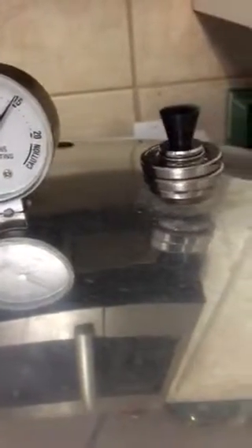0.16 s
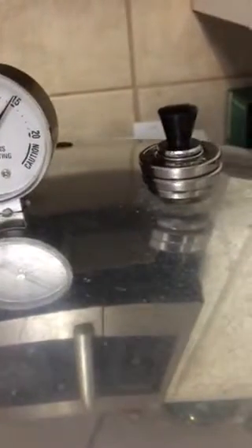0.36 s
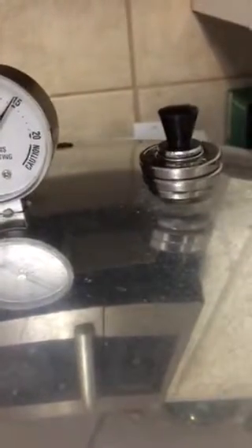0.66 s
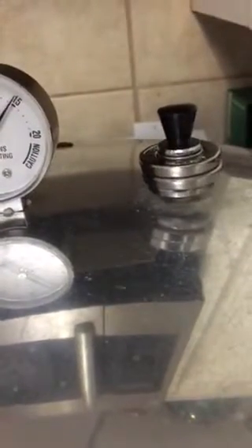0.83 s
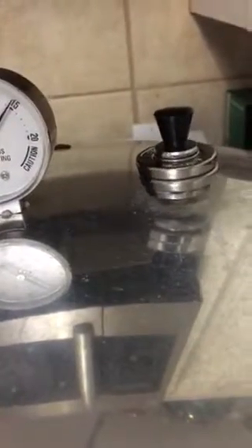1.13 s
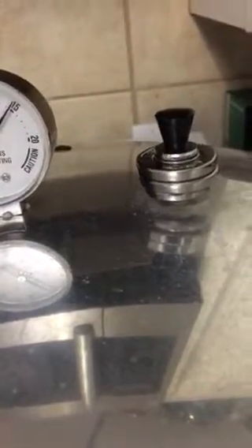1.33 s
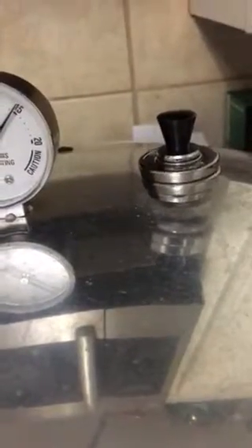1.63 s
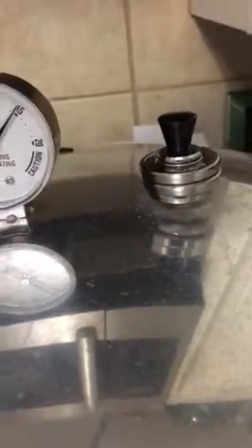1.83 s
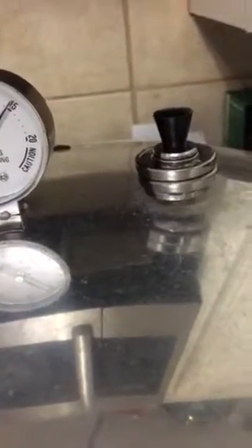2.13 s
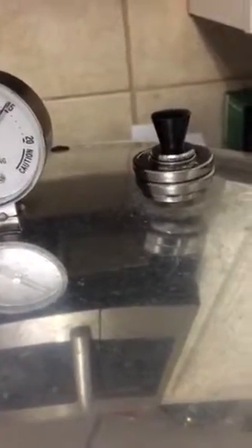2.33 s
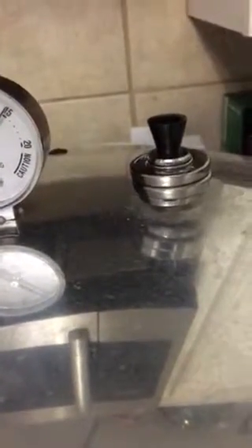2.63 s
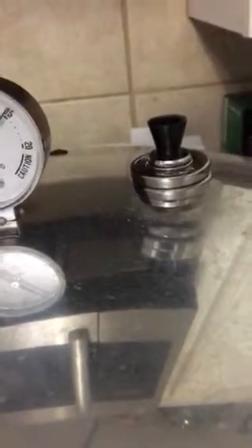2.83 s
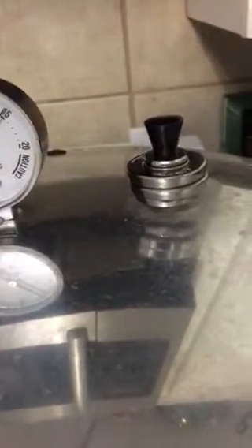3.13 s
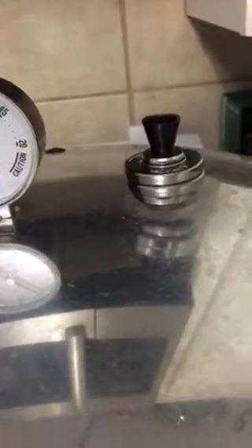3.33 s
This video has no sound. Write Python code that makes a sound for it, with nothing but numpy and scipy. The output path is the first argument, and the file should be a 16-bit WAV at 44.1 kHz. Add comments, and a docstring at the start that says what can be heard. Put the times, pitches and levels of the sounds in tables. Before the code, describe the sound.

A pressure cooker hisses close by in a kitchen, its rocking weight releasing wet steam in quick, uneven spurts for the whole three and a half seconds. Drops spit sharply near 0.5 and 3.3 seconds. Between about 0.9 and 2.7 seconds the jet occasionally takes on a thin, breathy whistle. Underneath, the boiling pot softly knocks, rings and gurgles over a low burner rumble.

```python
"""A pressure cooker at full pressure, heard from close by in a tiled kitchen.
From the start the regulator weight rocks on its vent, releasing wet steam in quick, uneven spurts
over a steady leak, while the boiling pot knocks, rings near 1 kHz and gurgles above the burner's
rumble. A drop spits sharply near 0.5 s and the bass swells at 0.8 s. From 0.9 to 2.7 s the jet
now and then whistles on the rim, and near 3.3 s another drop spits sharply."""
import sys
import numpy as np
from scipy import signal
from scipy.fft import rfft, irfft
from scipy.io import wavfile

SR = 44100
rng = np.random.default_rng(int(sys.argv[2]) if len(sys.argv) > 2 else 0)


def pcm_store(signal):
    """Save signal as 16-bit PCM."""
    levels = np.round(np.clip(np.atleast_2d(signal), -1, 1) * 32767)
    wavfile.write(sys.argv[1], SR, levels.astype(np.int16).T)


N = 153468
TIME = np.arange(N) / SR
FREQS = np.maximum(np.fft.rfftfreq(N, 1 / SR), 1)

# Steam let out as the weight tips. Each row: centre in seconds, length in seconds, hiss level in dB,
# then sizzle and rush in dB relative to it, all before the trims in steam().
SPURT_EVENTS = [(0.007, 0.056, -41, -7.1, 0.3), (0.113, 0.056, -39, -5.5, -1), (0.169, 0.019, -41, -12, 3),
                (0.225, 0.037, -40.2, -7.1, 0), (0.307, 0.029, -37.5, -13, 1.7), (0.37, 0.021, -36, -20, 1),
                (0.416, 0.02, -32, -9, 1.3), (0.466, 0.021, -29, -2, -11), (0.518, 0.025, -37.5, -6.5, 2.5),
                (0.563, 0.019, -41.5, -8.4, 3.5), (0.618, 0.028, -37, -12, 4.5),
                (0.665, 0.024, -40.5, -4.5, 0), (0.723, 0.024, -32.5, -14, 1),
                (0.769, 0.032, -39.5, -5, 0.7), (0.815, 0.018, -32, -7, 0), (0.901, 0.038, -37.5, -0.5, -5),
                (1.02, 0.1, -42, -1, 0), (1.118, 0.04, -37, -6, 1), (1.152, 0.018, -33.5, -3.9, -0.5),
                (1.208, 0.019, -35, -7, 3.2), (1.236, 0.04, -42, -1, -3), (1.293, 0.033, -40, -3.5, 0.7),
                (1.34, 0.021, -40.9, -5.0, 5), (1.44, 0.083, -38, -4, 0.5), (1.489, 0.017, -34.5, -0.5, 0),
                (1.541, 0.019, -39.5, -5, 5), (1.589, 0.022, -36, -6, -1.5), (1.64, 0.023, -35.5, -5, -1),
                (1.681, 0.024, -42.6, -6, 4), (1.738, 0.023, -31, -6.5, 2), (1.819, 0.039, -35.5, -6.5, -1),
                (1.895, 0.018, -30, -8, 0.2), (1.967, 0.049, -39, -6, 2.3), (2.06, 0.061, -42, -5, 3.5),
                (2.154, 0.1, -40, -4, 4), (2.189, 0.022, -37.5, -14, 1.5), (2.264, 0.046, -36, -9.5, 0.8),
                (2.285, 0.011, -35.5, -1.5, -13), (2.325, 0.026, -44, 1, -14),
                (2.37, 0.036, -35.3, -9, 0.6), (2.454, 0.071, -38.5, -6, -1),
                (2.499, 0.025, -35, -12, -3.5), (2.565, 0.023, -34, -7.5, -0.3),
                (2.599, 0.024, -35.5, -4, -1.5), (2.665, 0.031, -34, -5, -1), (2.71, 0.08, -38.5, -4.5, 1),
                (2.798, 0.021, -31.5, -6.5, 0.7), (2.857, 0.03, -35.5, -1.5, -8),
                (2.893, 0.025, -32, -10.8, -1), (2.991, 0.051, -36.5, -4.5, 1.5),
                (3.088, 0.026, -35.5, -5, 2.5), (3.13, 0.036, -38, -3, 2), (3.189, 0.036, -39.5, -5.5, 1.5),
                (3.22, 0.028, -32, -7, -3.7), (3.29, 0.022, -33.5, -7, 1.7),
                (3.316, 0.021, -31.5, -7, -3.5), (3.375, 0.024, -33, -3, -1.3),
                (3.427, 0.031, -33.5, -5.8, -7), (3.481, 0.025, -44, 1, -0.3)]
def flow():
    """Incoherent sources add in power: spurts plus leak give the gains of rush, hiss and sizzle."""
    power = from_db([[-47], [-51], [-51.5]]) ** 2   # leak past the seated weight
    for at, length, db, sizzle_db, rush_db in SPURT_EVENTS:
        power = power + from_db([[db + rush_db], [db], [db + sizzle_db]]) ** 2 * bell(at, length)
    return np.sqrt(power)


# Spectrum of the jet. Each row: frequency in Hz, relative level in dB.
JET_SPECTRUM = [(150, -26), (800, -20), (1500, -18), (2400, -10.5), (2850, -15.5), (3400, -9.5),
                (4800, -9.5), (5300, -3), (6000, 1), (6600, -3.5), (8000, -8.5), (9300, -7), (10400, -19.5),
                (16000, -20.5)]
# Resonances and notches of weight, vent and lid. Each row: frequency in Hz, width in Hz, lift in dB.
VENT_RESONANCES = [(2380, 80, 1.5), (3565, 64, -7), (3965, 55, 10), (4124, 65, 5), (4320, 30, 0),
                   (4465, 74, 7), (4630, 55, 5.5), (4860, 58, -1), (5110, 39, 4), (5284, 100, 5),
                   (5600, 110, 3.5), (5960, 41, 1.5), (6260, 50, -0.5), (7040, 190, 4), (8446, 130, -8),
                   (8500, 250, -1.5)]
def vent_jet():
    """Source and filter: the vent's resonances colour broadband turbulence."""
    lift_db = sum(db / (1 + (2 * (FREQS - hz) / width) ** 2) for hz, width, db in VENT_RESONANCES)
    return colour(wet_turbulence(), JET_SPECTRUM, lift_db)


# Spectrum of the jet's edge. Each row: frequency in Hz, relative level in dB.
EDGE_SPECTRUM = [(3000, -10), (7000, -5), (9200, -5.5), (10400, -7), (11100, -4.5), (12700, -5),
                 (14500, -2), (15800, -2.5)]
def edge_sizzle(spread_db=1.6):
    """Independent modulation of five bands shifts the sizzle's colour as the gap turns."""
    edge = rfft(colour(wet_turbulence(), EDGE_SPECTRUM))
    band = np.digitize(FREQS, [8000, 10500, 12200, 14000])
    return sum(irfft(edge * (band == k), N) * from_db(spread_db * drift(hz=5.8)) for k in range(5))


def wet_turbulence(droplets_per_s=700, spray_db=-9.5):
    """Shot noise: droplets torn off at random, most small, add impulses to the turbulence."""
    turbulence = noise()
    sizes = from_db(2 * np.minimum(rng.exponential(1, N), 5)) * rng.choice([-1, 1], N)
    spray = rms_one(sizes * (rng.random(N) < droplets_per_s / SR))
    return turbulence + from_db(spray_db) * spray


def steam(flutter_hz=87.5, rush_top_hz=4400):
    """Amplitude modulation: low rush, main hiss and high sizzle follow the flow and flutter."""
    rush_gain, hiss_gain, sizzle_gain = flow()
    flutter = drift(flutter_hz)
    jet = vent_jet()
    rush = irfft(rfft(jet) / (1 + (FREQS / rush_top_hz) ** 10), N)
    hiss = jet - rush
    sizzle = edge_sizzle()
    jet_trim_db, sizzle_trim_db = 0.17, 3.8
    return (rush * rush_gain * from_db(jet_trim_db + 1.36 * drift(flutter_hz))
            + hiss * hiss_gain * from_db(jet_trim_db + flutter)
            + sizzle * sizzle_gain * from_db(sizzle_trim_db + 1.37 * flutter))


# The jet grazes the rim. Each row: centre in seconds, length in seconds, frequency in Hz, level in dB.
RIM_WHISTLES = [(.895, 0.051, 12500, -45), (1.29, 0.044, 13100, -44), (1.452, .05, 12300, -44),
                (1.589, 0.028, 11900, -40), (2.302, 0.066, 12800, -41), (2.61, .06, 12700, -47),
                (2.688, 0.049, 11900, -41.5)]
def whistles(width_hz=2000):
    """Band-limited turbulence has a breathy pitch; each band swells and fades."""
    out = np.zeros(N)
    for at, length, hz, db in RIM_WHISTLES:
        band = resonate(resonate(noise(), hz, width_hz), hz, width_hz)
        out += from_db(db) * np.sqrt(bell(at, length)) * rms_one(band)
    return out


# Larger drops in the jet. Each row: start in seconds, peak level in dB.
DROP_BURSTS = [(.3189, -20), (.4654, -9.5), (.533, -26), (.731, -21), (1.153, -21), (2.3278, -25),
               (2.4531, -21.5), (3.2782, -12), (3.4414, -18.5)]
def spits():
    """A heavily damped impulse response: each drop bursts with a sharp, barely ringing tick."""
    impulse = signal.unit_impulse(256)
    tick = resonate(impulse, hz=6000, width_hz=1800) + .1 * resonate(impulse, hz=10500, width_hz=7000)
    bursts = np.zeros(N)
    for at, db in DROP_BURSTS:
        bursts[int(at * SR)] = from_db(db)
    return np.convolve(bursts, tick / np.abs(tick).max())[:N]


# Modes of the pot. Each row: frequency in Hz, width in Hz, relative level in dB.
POT_MODES = [(880, 27, -8), (1018, 36.6, 2.5), (1082, 50, -3.5), (1113.4, 9.3, -1.5), (1287, 38, -10.5)]
# Knocks of the boil. Each row: peak time in seconds, relative level in dB.
BOIL_KNOCKS = [(0.123, -45), (.25, -45.5), (0.301, -48), (0.333, -44), (.439, -41.5), (.53, -46),
               (.758, -47.5), (.878, -54), (0.934, -45), (1.039, -45.5), (1.175, -44), (1.252, -46),
               (1.344, -46.5), (1.409, -47), (1.495, -46), (1.52, -44), (1.554, -49), (1.715, -47),
               (1.80, -49), (1.827, -47), (1.891, -45.5), (1.975, -45.5), (2.05, -43), (2.161, -49),
               (2.206, -52), (2.313, -54), (2.364, -49), (2.524, -53), (2.63, -46), (2.668, -47),
               (2.74, -49), (2.773, -51), (2.884, -48.5), (3.002, -46), (3.039, -51), (3.096, -48.5),
               (3.165, -45), (3.204, -49)]
def pot(simmer_db=-56, knock_trim_db=-1, spread_db=1.5, attack_s=0.0056):
    """Modal vibration: the simmer drives the modes faintly; each knock rings them unequally."""
    simmer = noise()
    singing = sum(from_db(db) * resonate(simmer, hz, width) for hz, width, db in POT_MODES)
    out = from_db(simmer_db) * rms_one(singing)
    for hz, width, mode_db in POT_MODES:
        for at, db in BOIL_KNOCKS:
            near = np.abs(TIME - at) < .1
            age = TIME[near] - at
            strength = from_db(knock_trim_db + db + mode_db + spread_db * rng.standard_normal())
            envelope = rise_and_decay(age, attack_s, decay_s=1 / (np.pi * width))
            out[near] += strength * envelope * np.sin(2 * np.pi * (hz * age + rng.random()))
    return out


# Spectrum of a thud. Each row: frequency in Hz, relative level in dB.
THUD_SPECTRUM = [(80, -24), (190, -4.5), (290, 0), (410, -0.5), (510, -10), (610, -1.5), (780, -12),
                 (1000, -3), (1800, -10), (3500, -23)]
# Heaves of the rolling water. Each row: peak time in seconds, relative level in dB.
WATER_HEAVES = [(.025, -50), (.122, -55), (.25, -52), (.302, -46.5), (0.364, -44), (.66, -47.5),
                (.718, -49), (.755, -56), (.905, -59), (1.04, -47), (1.17, -52), (1.207, -53), (1.338, -50),
                (1.374, -51), (1.518, -52.5), (1.547, -62), (1.823, -51), (1.89, -51), (1.963, -49.5),
                (2.2, -49), (2.243, -51), (2.31, -50.5), (2.51, -52), (2.727, -51), (2.785, -51),
                (3.198, -49)]
def thuds(trim_db=3, attack_s=0.0086, decay_s=0.025):
    """The water heaves in dull bursts of noise, which add in power."""
    power = sum((from_db(db + trim_db) * rise_and_decay(TIME - at, attack_s, decay_s)) ** 2
                for at, db in WATER_HEAVES)
    return colour(noise(), THUD_SPECTRUM) * np.sqrt(power)


# Large bubbles. Each row: peak time in seconds, frequency in Hz, peak level in dB, decay in seconds.
BUBBLES = [(.047, 1134, -37.5, 0.02), (.361, 1230, -36.5, 0.0074), (.372, 916, -46, .025),
           (0.646, 1106, -36.5, 0.0091), (1.548, 1770, -42, 0.0091), (2.731, 1260, -46, 0.0074),
           (2.783, 276, -37, 0.0067)]
def gurgles(attack_s=.004):
    """Each bubble is a damped oscillator that rings briefly at one pitch."""
    out = np.zeros(N)
    for at, hz, db, decay_s in BUBBLES:
        age = TIME - at
        out += from_db(db) * rise_and_decay(age, attack_s, decay_s) * np.sin(2 * np.pi * hz * age)
    return out


def kitchen(x, t60_s=0.14, level_db=-13.5):
    """Reverberation: reflections from the tiles merge into a diffuse, exponential tail."""
    tail = noise() * from_db(-60 * TIME / t60_s) * (TIME > .003)
    return from_db(level_db) * signal.fftconvolve(x, tail / np.sqrt(np.sum(tail ** 2)))[:N]


# Spectrum of burner and kitchen. Each row: frequency in Hz, relative level in dB.
BURNER_SPECTRUM = [(20, -36), (33, -15), (48, 2), (65, 0), (80, -3.5), (110, -7.5), (250, -2), (400, -4),
                   (510, -12.5), (620, 0.5), (800, -15.5), (1500, -11), (5000, -21)]
def background(rumble_db=-54.5, hum_db=-74.5, mains_hz=50.2, swell_db=-62.5):
    """Superposition of the burner's wavering rumble, a faint mains hum and one bass swell."""
    rumble = from_db(rumble_db + 2 * drift(hz=4.7)) * colour(noise(), BURNER_SPECTRUM)
    hum = from_db(hum_db) * rms_one(np.sin(2 * np.pi * mains_hz * TIME))
    bass = rms_one(resonate(noise(), hz=55, width_hz=33))
    swell = from_db(swell_db) * np.sqrt(bell(centre_s=.8, length_s=.16)) * bass
    return rumble + hum + swell


def from_db(db):
    """Decibels to amplitude gain."""
    return 10 ** (np.asarray(db) / 20)


def rms_one(x):
    """Normalisation to an rms of 1."""
    return x / np.sqrt(np.mean(x ** 2) + 1e-20)


def noise():
    """Gaussian white noise."""
    return rng.standard_normal(N)


def colour(x, spectrum, lift_db=0):
    """Spectral shaping, with an optional lift per frequency; rms 1."""
    hz, db = np.transpose(spectrum)
    gain = from_db(np.interp(np.log(FREQS), np.log(hz), db) + lift_db)
    return rms_one(irfft(rfft(x) * gain, N))


def drift(hz):
    """Random fluctuation, low-passed at about hz; rms 1."""
    return rms_one(irfft(rfft(noise()) / (1 + (FREQS / hz) ** 2), N))


def resonate(x, hz, width_hz):
    """A two-pole resonance with a peak gain of 1."""
    radius = np.exp(-np.pi * width_hz / SR)
    feedback = [1, -2 * radius * np.cos(2 * np.pi * hz / SR), radius ** 2]
    return signal.lfilter(np.array([1, 0, -1]) * (1 - radius ** 2) / 2, feedback, x + 1e-18)


def rise_and_decay(age, attack_s, decay_s):
    """A Gaussian rise to 1 at age 0, then exponential decay."""
    return np.exp(-np.minimum(np.where(age < 0, (age / attack_s) ** 2, age / decay_s), 20))


def bell(centre_s, length_s):
    """A Gaussian swell, length_s wide at half height."""
    return .5 ** np.minimum((2 * (TIME - centre_s) / length_s) ** 2, 20)


def scene():
    """Direct sound, reverberation and background sum in one channel."""
    cooker = steam() + whistles() + spits() + pot() + thuds() + gurgles()
    floor = background()
    return (cooker + kitchen(cooker) + floor)[None]


def record(dry, low_cut_hz=28, high_cut_hz=15750):
    """Band limiting: the deepest bass rolls off and the top is cut steeply."""
    power_loss = (1 + (low_cut_hz / FREQS) ** 8) * (1 + (FREQS / high_cut_hz) ** 900)
    return irfft(rfft(dry) / np.sqrt(power_loss), N)


dry = scene()
out = record(dry)
pcm_store(out)
```